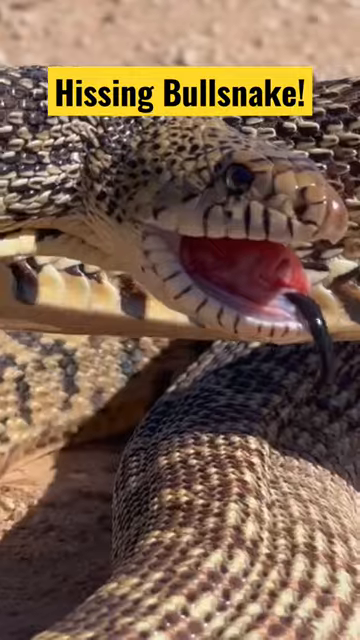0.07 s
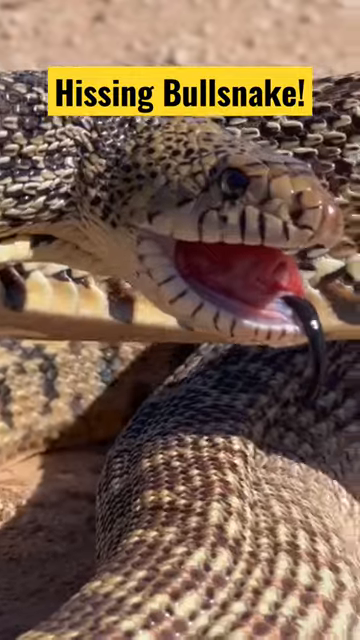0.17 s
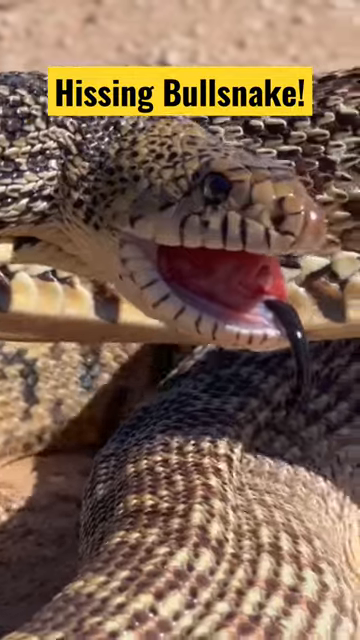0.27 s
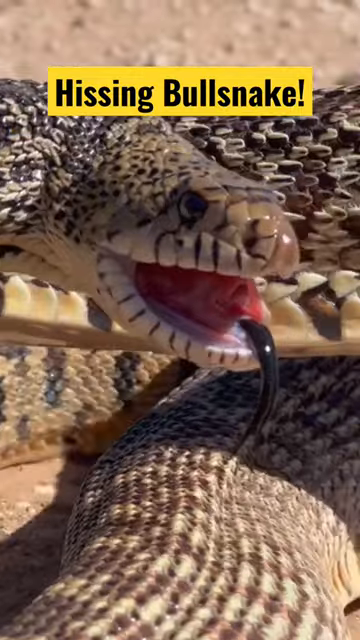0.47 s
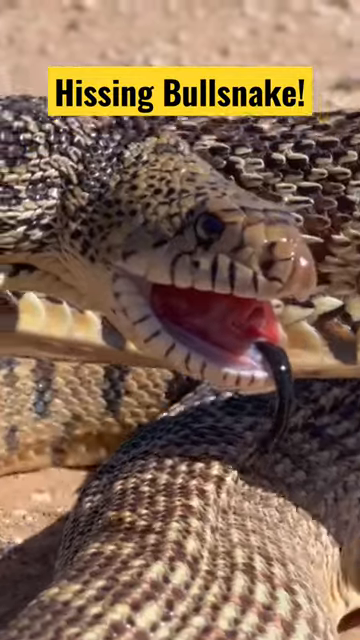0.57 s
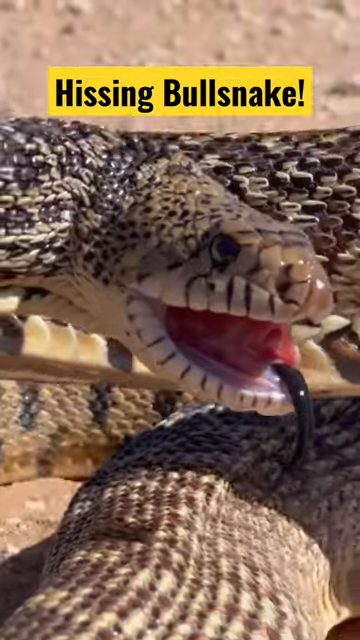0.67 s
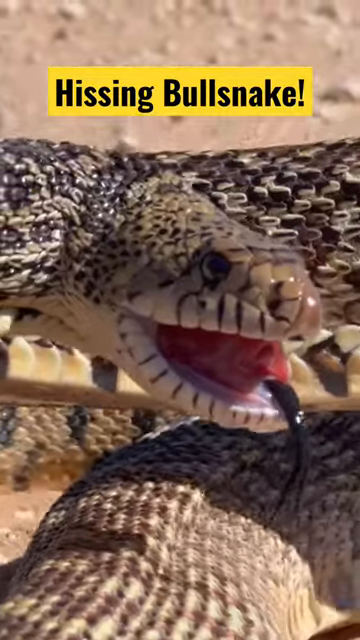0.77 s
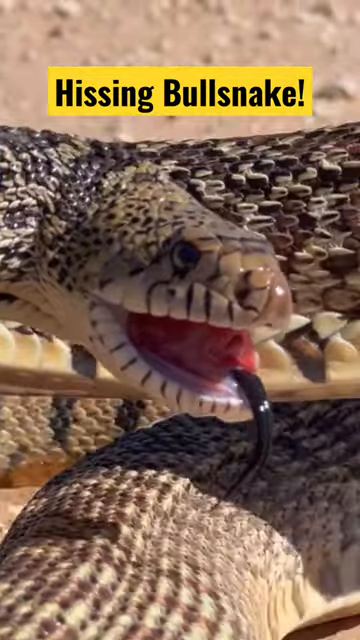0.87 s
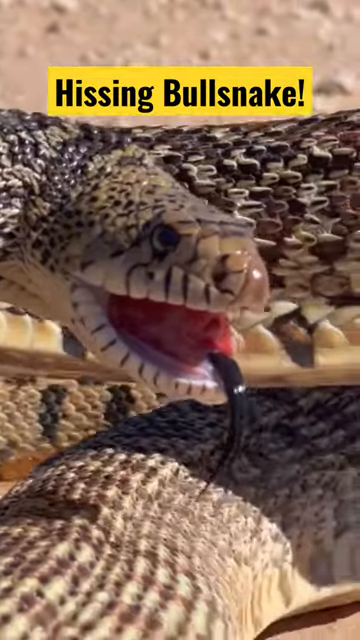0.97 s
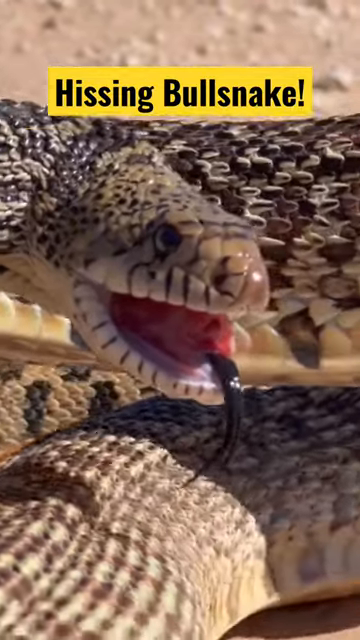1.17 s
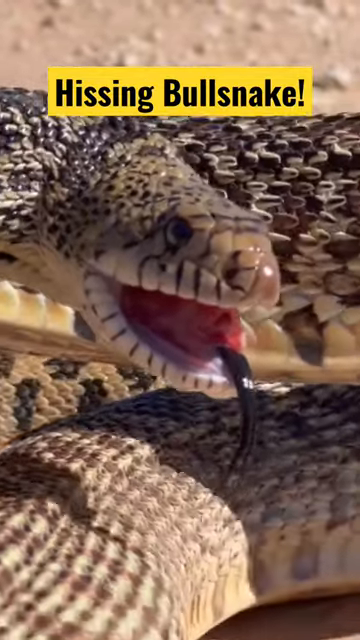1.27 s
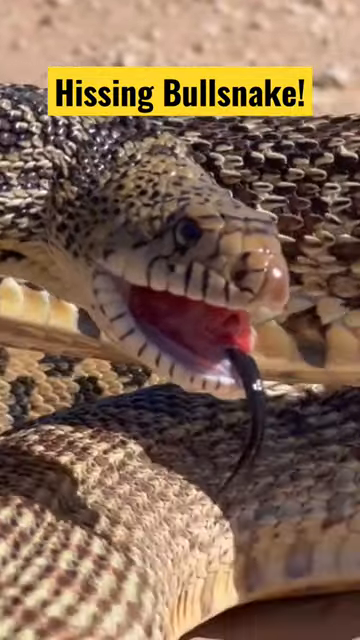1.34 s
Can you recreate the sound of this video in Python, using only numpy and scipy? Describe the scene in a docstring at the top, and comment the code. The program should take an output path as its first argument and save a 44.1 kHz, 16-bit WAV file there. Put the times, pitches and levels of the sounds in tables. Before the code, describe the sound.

A snake hisses continuously, close to the microphone outdoors, its breathy rush fluttering rapidly and shifting slightly in tone. A light breeze rumbles underneath, with a few deep wind thumps near the end.

```python
"""One long, fluttering hiss from a bullsnake, mouth open, close to the microphone outdoors.
The jet of air flutters on the flap in front of its windpipe about sixty times a second and sounds the
resonances of the mouth, which shift as the head moves. A tiny tick and a faint, dull scuff pass under it.
A light breeze rumbles on the microphone, with deep buffets at the end."""
import sys
import numpy as np
from scipy import signal
from scipy.fft import rfft, irfft
from scipy.io import wavfile

SR = 44100
rng = np.random.default_rng(int(sys.argv[2]) if len(sys.argv) > 2 else 0)


def wav_record(signal):
    """Record a signal, one row per channel, as 16-bit PCM in the file named by sys.argv[1]."""
    frames = np.transpose(np.atleast_2d(signal))
    bounded = np.clip(frames, -1, 1)
    # unit amplitude maps onto the largest positive 16-bit level
    quanta = np.round(bounded * 32767).astype(np.int16)
    wavfile.write(sys.argv[1], SR, quanta)


N = 124803

# Flutter of the flap: time_s, rate_hz
FLUTTER_RATE = [(0, 67), (.3, 61), (.55, 56), (.75, 60), (1.0, 67), (1.2, 57), (1.8, 64), (2.5, 67),
                (2.83, 57)]
# Moving resonances of the mouth, low to high: time_s, centre_hz, width_hz, level_db_per_hz
MOUTH_HOLLOW = [(0, 1720, 860, -92.5), (0.5, 1720, 860, -92), (1.2, 1670, 730, -89), (1.6, 1681, 630, -84),
                (2.1, 1650, 647, -85), (2.42, 1600, 427, -80), (2.6, 1600, 605, -86.5),
                (2.83, 1770, 766, -84)]
MOUTH_RASP = [(0, 2430, 895, -85), (.35, 2470, 910, -89.5), (.6, 2470, 900, -85.5), (.95, 2500, 955, -86),
              (1.15, 2480, 915, -83.5), (1.35, 2600, 750, -88), (1.65, 2730, 380, -85),
              (1.8, 2848, 300, -92), (2.15, 3050, 300, -88), (2.5, 3050, 300, -100)]
MOUTH_BITE = [(0, 3170, 450, -87.5), (.5, 3250, 400, -89), (.72, 3200, 300, -83), (.95, 3393, 450, -92),
              (1.2, 3380, 500, -94), (1.55, 3500, 400, -99), (1.8, 3700, 330, -91.5),
              (2.07, 3730, 320, -85.5), (2.2, 3620, 800, -92), (2.35, 3450, 870, -84.5),
              (2.6, 3320, 800, -91.5), (2.83, 3140, 600, -84.5)]
MOUTH_KEEN = [(0, 4700, 500, -101), (1.3, 4700, 500, -108), (1.75, 4300, 500, -99), (2.15, 4200, 500, -92),
              (2.38, 4300, 480, -87), (2.6, 4320, 480, -90.5), (2.83, 4260, 480, -89.5)]
MOUTH_WHISTLE = [(0, 6230, 965, -84.5), (.35, 5920, 1050, -83), (.55, 6170, 1020, -87.5),
                 (.77, 6060, 1010, -84.5), (1.05, 6360, 800, -92), (1.4, 6300, 450, -86.5),
                 (1.65, 6090, 385, -85.5), (2.15, 6070, 340, -87.5), (2.5, 6330, 360, -91),
                 (2.83, 6500, 500, -85)]
MOUTH_SIBILANCE = [(0, 7600, 1150, -92), (0.5, 8150, 900, -89), (0.8, 8230, 700, -86.5),
                   (1.15, 7400, 1190, -89.5), (1.65, 7700, 1600, -86.5), (2, 7300, 1150, -89.0),
                   (2.45, 7260, 754, -87), (2.83, 7170, 684, -88.5)]
MOUTH_SIZZLE = [(0, 9240, 1200, -89), (0.35, 8660, 1300, -89.5), (0.8, 9000, 1200, -85.5),
                (1.17, 9080, 1020, -85), (1.65, 9150, 1080, -92.5), (1.87, 9300, 1210, -88.5),
                (2.35, 9070, 1010, -84), (2.6, 9500, 1400, -88.5), (2.83, 9400, 1450, -87.5)]
MOUTH_EDGE = [(0, 10700, 600, -100), (.6, 10650, 650, -94), (1.0, 10700, 600, -102),
              (1.25, 11250, 450, -100), (1.55, 11400, 600, -98), (1.68, 10950, 650, -96),
              (1.8, 10700, 650, -90.5), (2.05, 10400, 700, -91), (2.3, 10000, 550, -88),
              (2.5, 10300, 700, -93), (2.65, 11050, 650, -95), (2.83, 11150, 650, -93)]
MOUTH_AIR = [(0, 13740, 1160, -92), (0.35, 13400, 1130, -94), (0.65, 13900, 1500, -90),
             (1.25, 14040, 1180, -98.5), (1.6, 13980, 1350, -94), (1.85, 14300, 1550, -101.3),
             (2.4, 14200, 2330, -100.6), (2.83, 14900, 1520, -104.6)]
# Moving dips in the hiss, at times slight peaks: time_s, centre_hz, width_hz, gain_db
NOTCH_LOW = [(0, 2000, 300, 1), (1.1, 2100, 300, -1), (1.6, 2070, 280, -8), (2, 2350, 400, -6),
             (2.35, 2743, 365, -7.5), (2.83, 2800, 380, -3.5)]
NOTCH_MID = [(0, 4050, 400, 1), (.6, 4340, 400, -0.5), (.9, 4400, 500, 1.5), (1.22, 5000, 650, -6),
             (1.55, 5250, 400, 3), (2.05, 5300, 400, 0.5), (2.35, 5300, 500, -1.5), (2.83, 5300, 597, -6)]
NOTCH_HIGH = [(0, 12100, 700, 0), (.6, 12100, 700, -4), (.95, 11650, 700, -2), (1.25, 10900, 500, -4),
              (1.5, 10800, 500, -3), (1.7, 11200, 500, -1), (1.95, 11600, 700, -4), (2.3, 11000, 700, -2),
              (2.5, 11800, 700, 2), (2.83, 12200, 700, -3)]
# Broad rush of the jet under the resonances: frequency_hz, level_db_per_hz
JET_SPECTRUM = [(150, -99.8), (450, -98.5), (1000, -100.1), (2500, -94), (4200, -97.5), (5000, -93.5),
                (8000, -99.7), (10800, -100.5), (12200, -105.5), (16000, -105.2)]
# Steady peaks and dips in the hiss: centre_hz, width_hz, gain_db
HISS_RIPPLE = [(680, 110, 3.2), (1140, 170, 3.8), (3050, 130, -2.6), (4060, 200, -1.6), (4770, 140, -2),
               (4980, 210, 2), (5320, 170, -2.8), (5560, 190, 2.4), (6540, 170, -2.8), (8290, 160, -2.4),
               (8580, 150, 2.4), (8820, 130, -1.6), (9720, 230, 1.5)]
# Faint echoes off the coils and the ground: delay_s, gain_db
NEAR_ECHOES = [(.00255, -43), (.0046, -21), (.0067, -45)]
# Rise and fall of the breeze on the microphone: time_s, level_db
BREEZE_LEVEL = [(0, -46), (.35, -45.5), (.6, -51), (.9, -47), (1.1, -49), (1.4, -47.5), (1.9, -47.5),
                (2.3, -51), (2.55, -47), (2.7, -50), (2.83, -39)]
# Colour of its rumble: frequency_hz, relative_db
BREEZE_SPECTRUM = [(5, -3.5), (10, -3), (22, -10.5), (35, -17.5), (55, -25), (80, -27.5), (120, -34),
                   (200, -39.5), (500, -49.5)]
# Buffets on the microphone: peak_s, half_width_s, peak_db, roughness (0-1)
WIND_BUFFETS = [(2.455, 0.023, -37.5, 0), (2.582, 0.018, -26.5, 0.02), (2.703, .03, -32.5, 0.14),
                (2.728, 0.01, -26, 0.1), (2.765, 0.016, -33, 0.22), (2.803, 0.0058, -31.5, 0.3)]


def hiss(t):
    """The snake, close up: fluttering turbulence sounds through the moving resonances of the mouth."""
    jet = airflow(t) * rng.standard_normal(N) * np.sqrt(SR / 2)   # unit power per Hz
    hz, frame_s, frames = signal.stft(jet, SR, nperseg=1024)
    hz = hz[:, None]
    power = from_db(at_hz(JET_SPECTRUM, hz)) ** 2
    for track in (MOUTH_HOLLOW, MOUTH_RASP, MOUTH_BITE, MOUTH_KEEN, MOUTH_WHISTLE,
                  MOUTH_SIBILANCE, MOUTH_SIZZLE, MOUTH_EDGE, MOUTH_AIR):
        centre_hz, width_hz, db = in_time(track, frame_s)
        power = power + from_db(db) ** 2 * resonance(hz, centre_hz, width_hz)
    notches = [in_time(track, frame_s) for track in (NOTCH_LOW, NOTCH_MID, NOTCH_HIGH)]
    colour_db = sum(db * resonance(hz, centre_hz, width_hz)
                    for centre_hz, width_hz, db in [*HISS_RIPPLE, *notches])
    shaped = frames * np.sqrt(power) * from_db(colour_db)
    return signal.istft(shaped, SR, nperseg=1024)[1][:N]


def airflow(t, swing_db=1, jitter=0.0734, squareness=2.7):
    """Strength of the jet: the flap opens and closes unevenly, and the air sputters past it."""
    rate_hz, = in_time(FLUTTER_RATE, t)
    uneven_hz = rate_hz * (1 + jitter * drift(rate_hz=32))
    phase = 2 * np.pi * np.cumsum(uneven_hz) / SR
    flutter_db = swing_db * np.tanh(squareness * np.sin(phase))
    sputter_db = 1.72 * drift(rate_hz=320)
    waver_db = 0.21 * drift(rate_hz=7.6)
    return rms_one(from_db(flutter_db + sputter_db + waver_db))


def near_echoes(direct):
    """The coils and the ground send faint copies to the microphone just behind the direct sound."""
    return direct + sum(from_db(db) * np.pad(direct, (int(delay_s * SR), 0))[:N]
                        for delay_s, db in NEAR_ECHOES)


def breeze(t):
    """Slow eddies press on the microphone and make it rumble."""
    hz = np.fft.rfftfreq(N, 1 / SR)
    eddies = shaped_noise(from_db(at_hz(BREEZE_SPECTRUM, hz)))
    level_db, = in_time(BREEZE_LEVEL, t)
    return from_db(level_db) * rms_one(low_pass(eddies, edge_hz=480, order=2))


def buffets(t):
    """Each buffet is one rounded push or pull on the microphone, roughened by small eddies."""
    pressure = np.zeros(N)
    for peak_s, half_width_s, peak_db, roughness in WIND_BUFFETS:
        swell = np.exp(-((t - peak_s) / half_width_s) ** 2)
        eddies = rms_one(low_pass(rng.standard_normal(N), edge_hz=62, order=4))
        push_or_pull = rng.choice([-1, 1])
        pressure += from_db(peak_db) * swell * (push_or_pull + roughness * eddies)
    return pressure


def puff(t, peak_s, half_width_s, peak_db, centre_hz, width_hz):
    """A small sound under the hiss: a short swell of noise in one resonance."""
    hz = np.fft.rfftfreq(N, 1 / SR)
    band = shaped_noise(np.sqrt(resonance(hz, centre_hz, width_hz)))
    swell = np.exp(-2 * ((t - peak_s) / half_width_s) ** 2)
    return from_db(peak_db) * swell * rms_one(band)


def resonance(hz, centre_hz, width_hz):
    """Power response of a resonance applied twice; the width is taken at half power."""
    return (1 + (np.sqrt(2) - 1) * (2 * (hz - centre_hz) / width_hz) ** 2) ** -2


def drift(rate_hz):
    """A smooth random wander of rms 1 that changes at about the given rate."""
    pole = np.exp(-2 * np.pi * rate_hz / SR)
    wander = signal.lfilter([1], [1, -2 * pole, pole * pole], rng.standard_normal(N + SR))
    return rms_one(wander[SR:])


def shaped_noise(gain):
    """White noise with a gain at each frequency."""
    return irfft(rfft(rng.standard_normal(N)) * gain, N)


def low_pass(x, edge_hz, order):
    """A Butterworth low-pass."""
    return signal.sosfilt(signal.butter(order, edge_hz, fs=SR, output="sos"), x)


def in_time(rows, t):
    """The columns of a table at the times t."""
    time_s, *columns = np.transpose(rows)
    return [np.interp(t, time_s, column) for column in columns]


def at_hz(points, hz):
    """A spectrum in dB, read on a log-frequency axis."""
    point_hz, db = np.transpose(points)
    return np.interp(np.log(np.maximum(hz, 1)), np.log(point_hz), db)


def from_db(db):
    """Decibels to gain."""
    return 10 ** (np.asarray(db) / 20)


def rms_one(x):
    """The same signal at rms 1."""
    return x / np.sqrt(np.mean(x ** 2) + 1e-20)


def scene():
    """One microphone in the open: the snake in front, wind, a scuff and a tick underneath."""
    t = np.arange(N) / SR
    snake = near_echoes(hiss(t))
    wind = breeze(t) + buffets(t)
    # The scuff is perhaps the coils, the tick perhaps spit.
    scuff = puff(t, peak_s=1.03, half_width_s=0.038, peak_db=-63.5, centre_hz=430, width_hz=89)
    tick = puff(t, peak_s=0.721, half_width_s=0.003, peak_db=-48.5, centre_hz=1420, width_hz=860)
    return (snake + wind + scuff + tick)[None]


def record(dry):
    """The sound starts after a moment of silence; the highest treble is cut steeply."""
    start_s, cutoff_hz = 0.036, 15800
    live = np.arange(N) / SR >= start_s
    treble_cut = signal.ellip(12, .1, 80, cutoff_hz, fs=SR, output="sos")
    return signal.sosfilt(treble_cut, dry * live)


dry = scene()
out = record(dry)
wav_record(out)
```